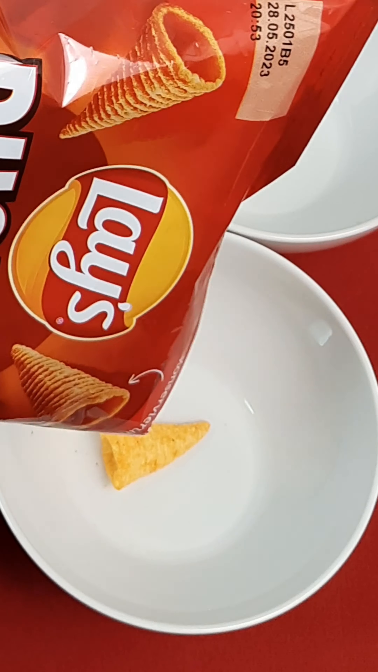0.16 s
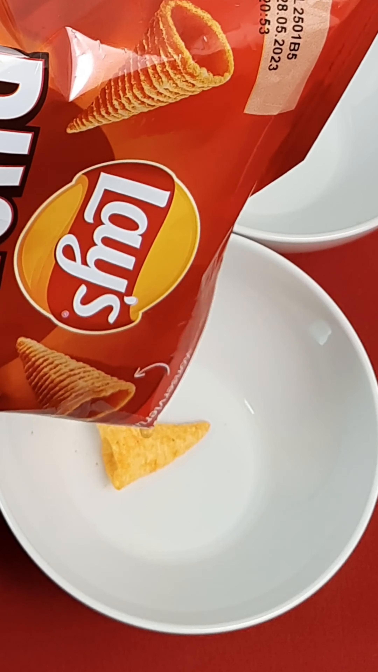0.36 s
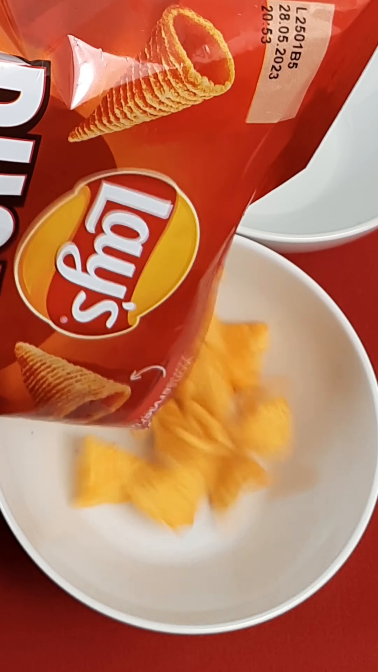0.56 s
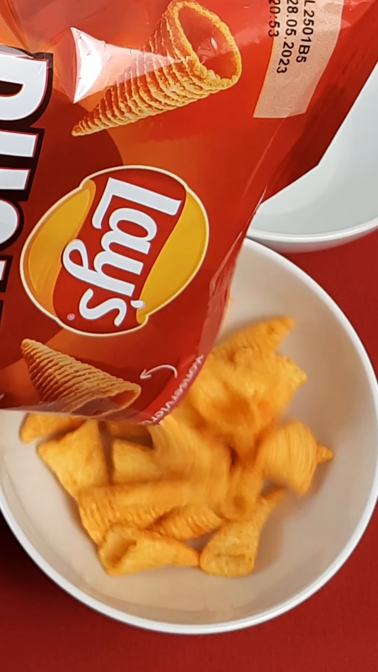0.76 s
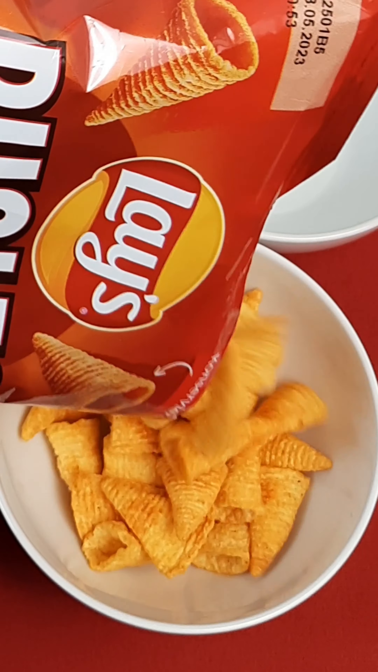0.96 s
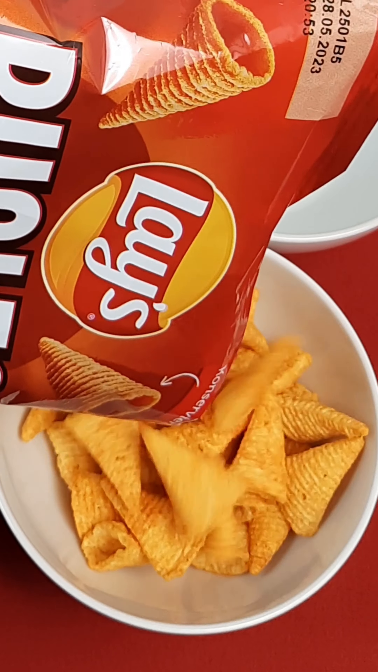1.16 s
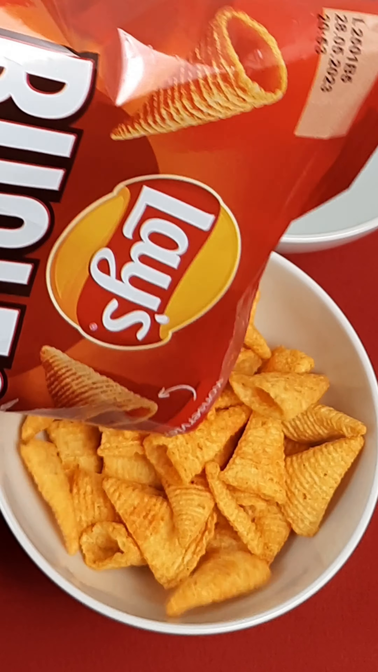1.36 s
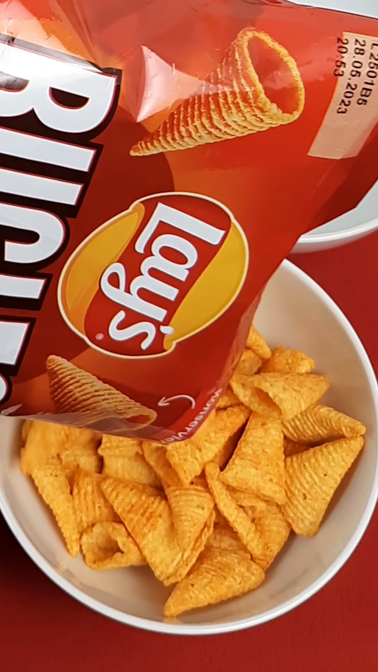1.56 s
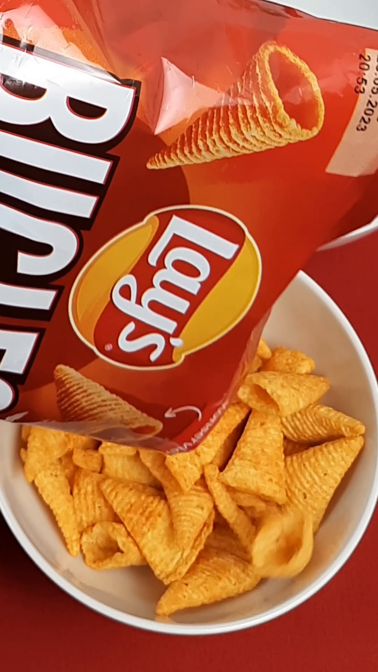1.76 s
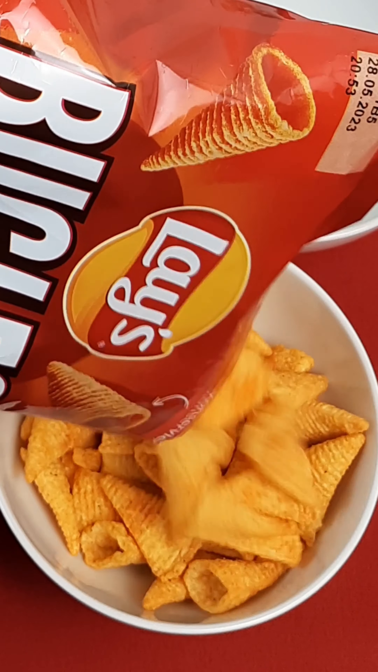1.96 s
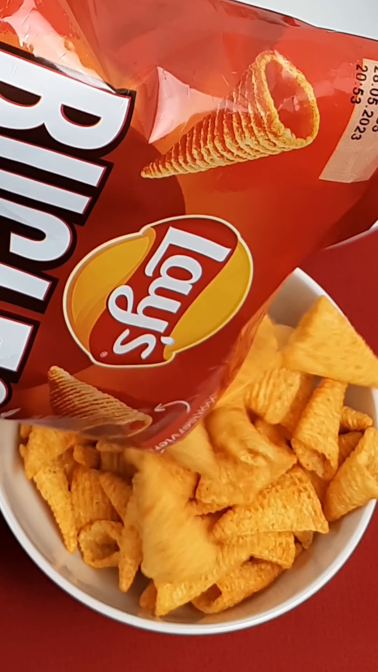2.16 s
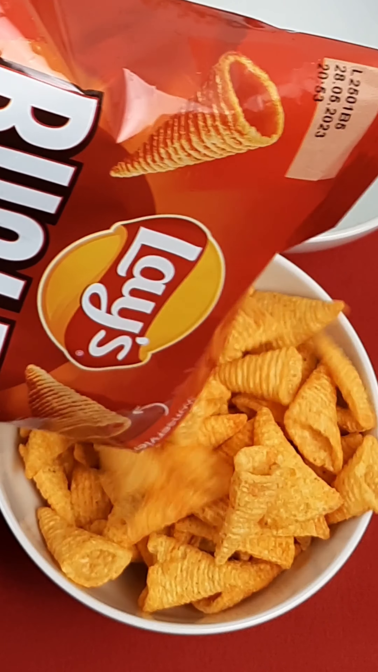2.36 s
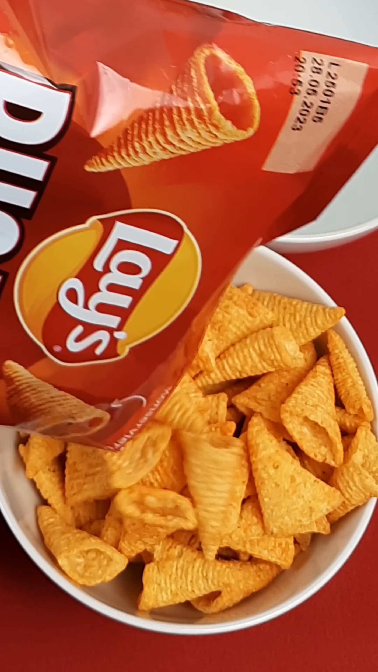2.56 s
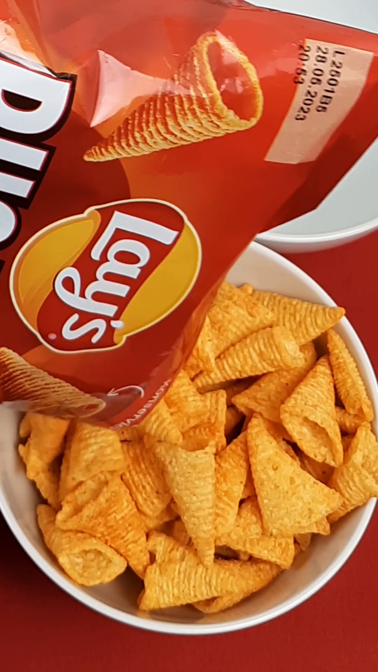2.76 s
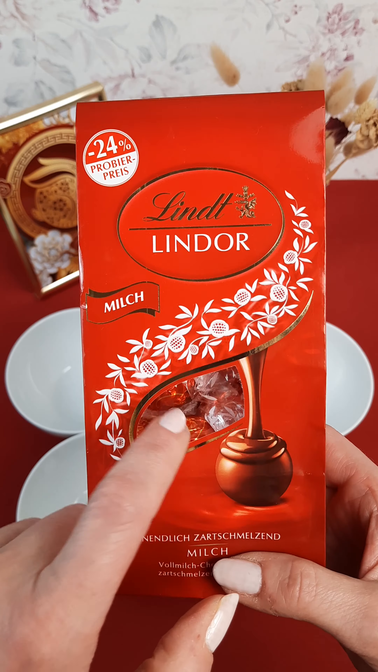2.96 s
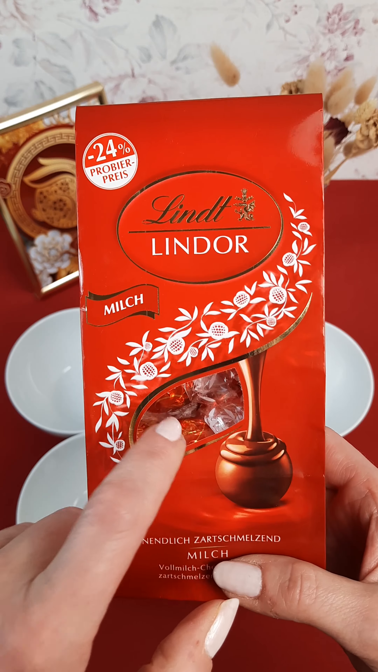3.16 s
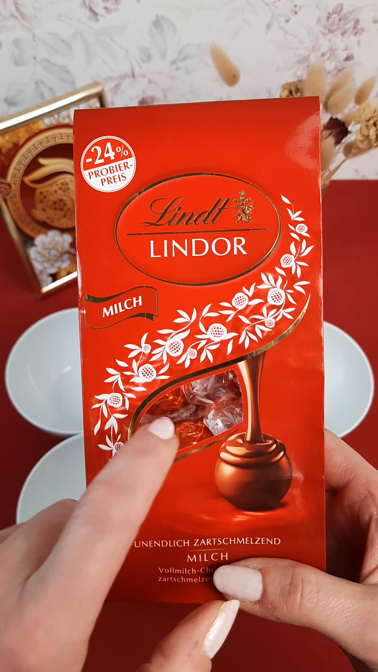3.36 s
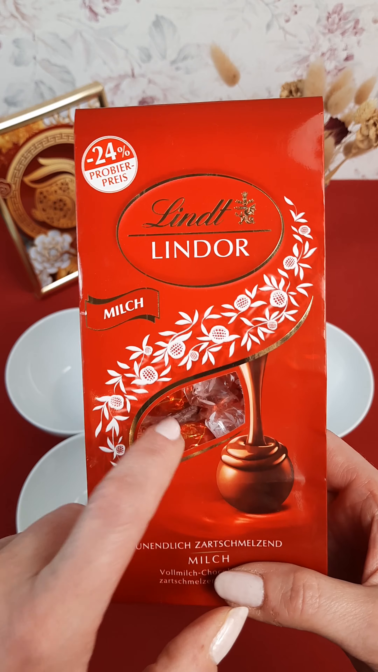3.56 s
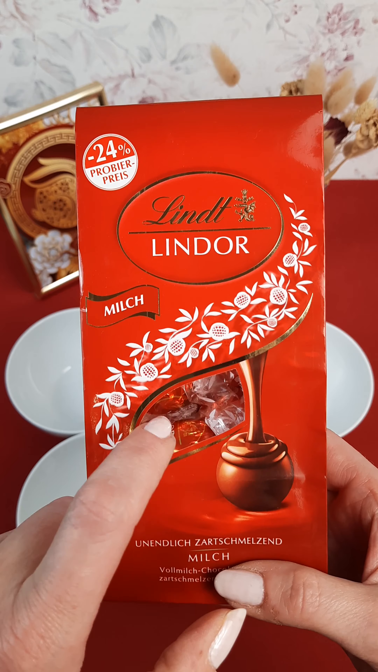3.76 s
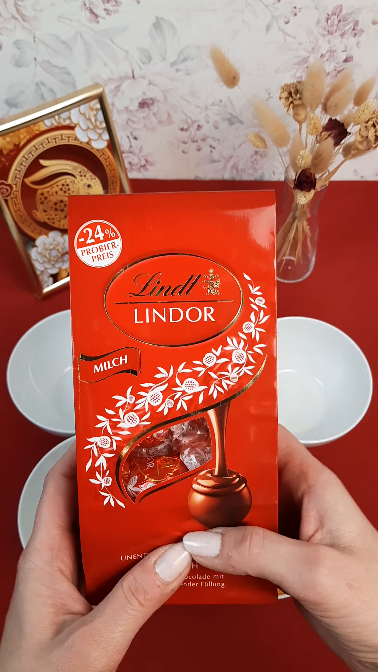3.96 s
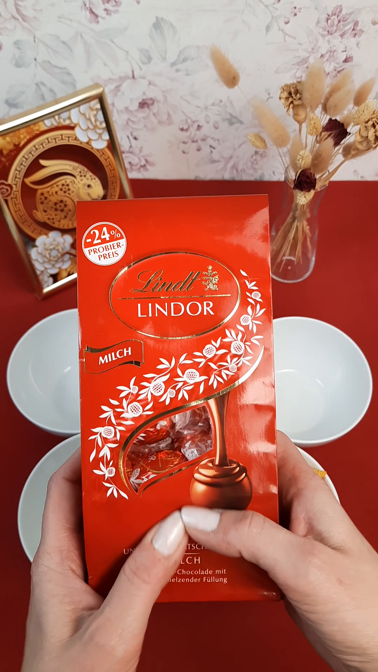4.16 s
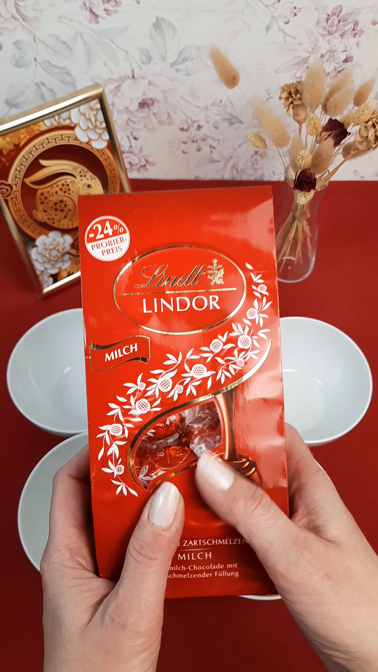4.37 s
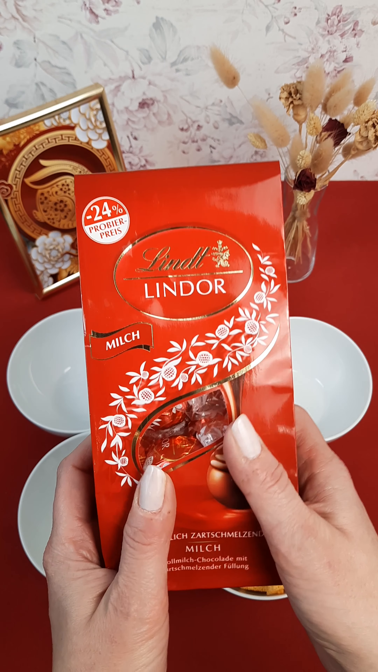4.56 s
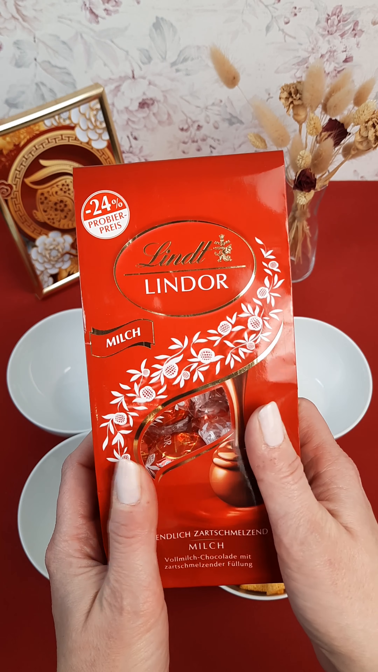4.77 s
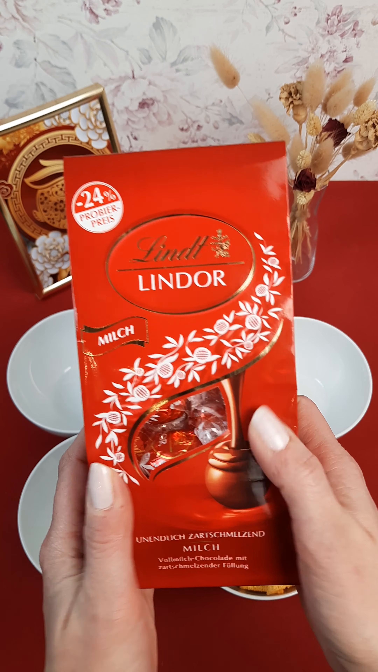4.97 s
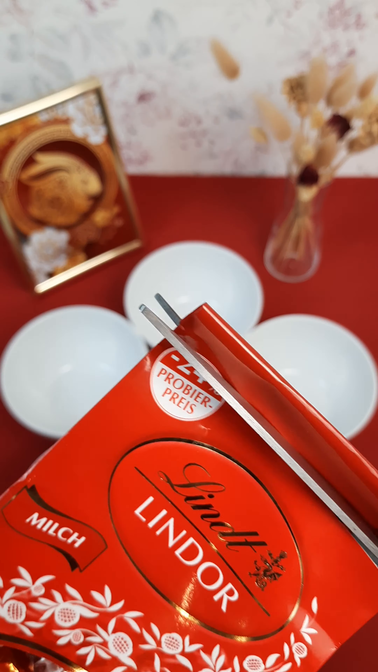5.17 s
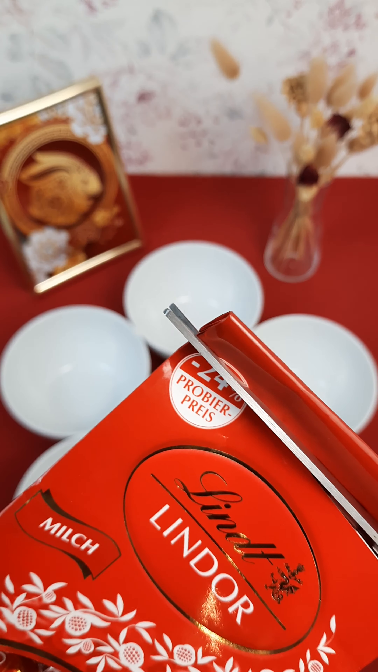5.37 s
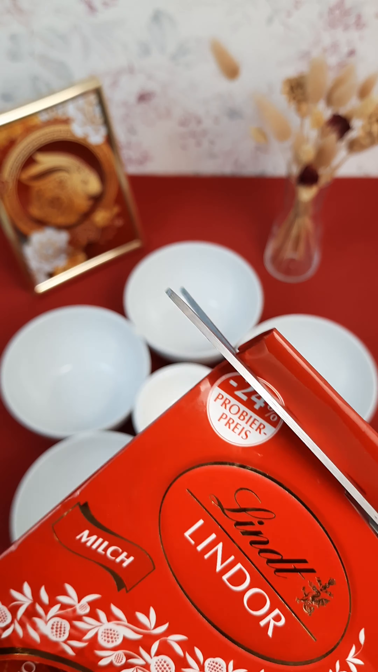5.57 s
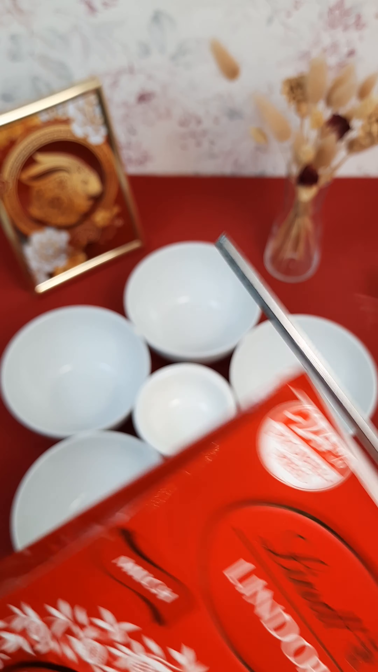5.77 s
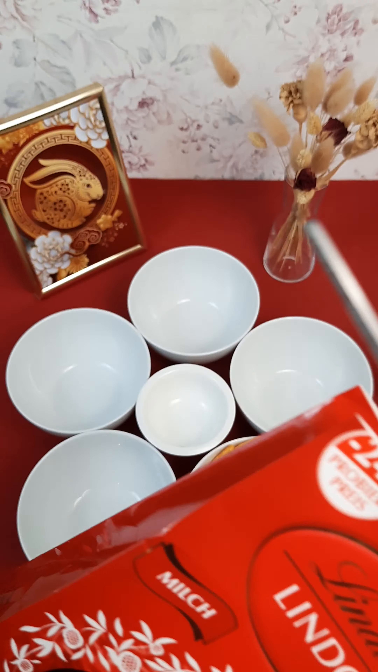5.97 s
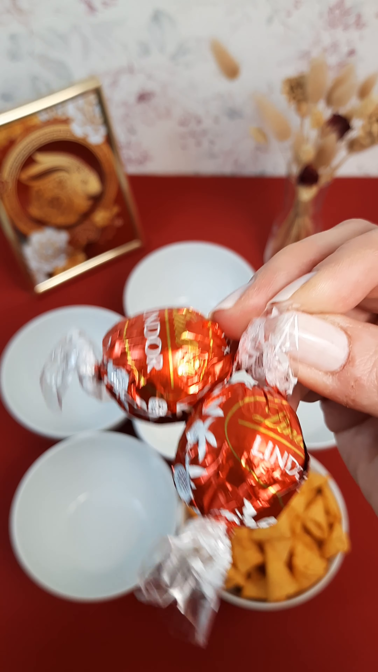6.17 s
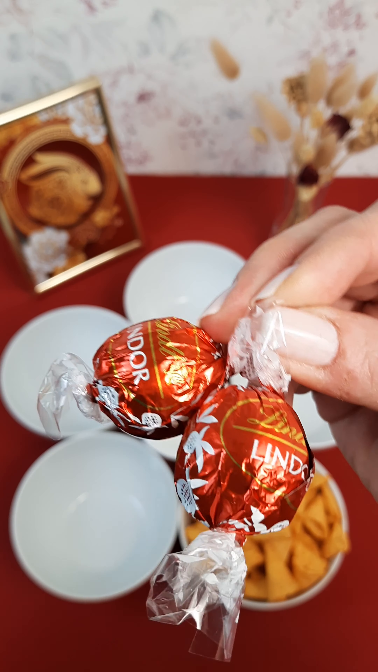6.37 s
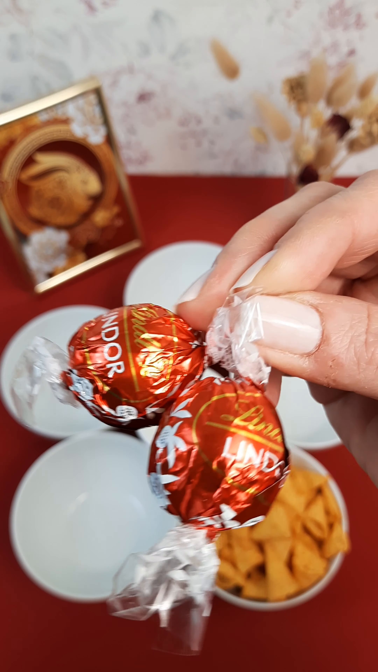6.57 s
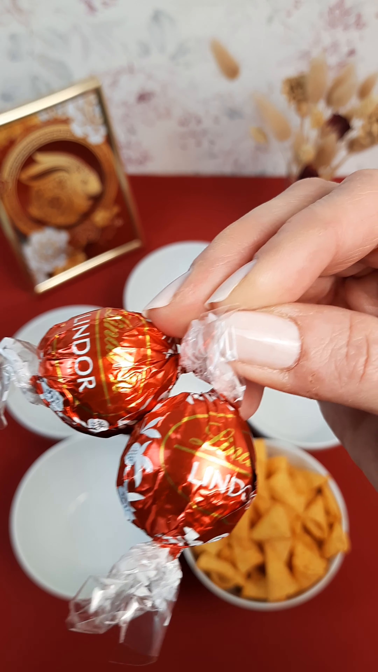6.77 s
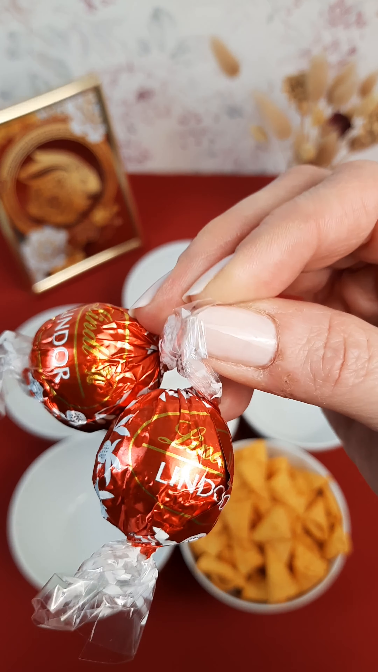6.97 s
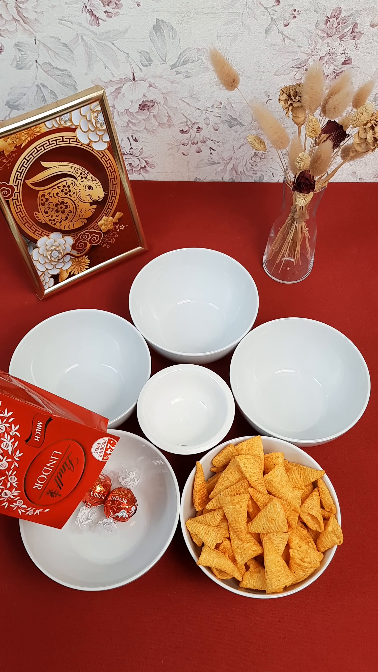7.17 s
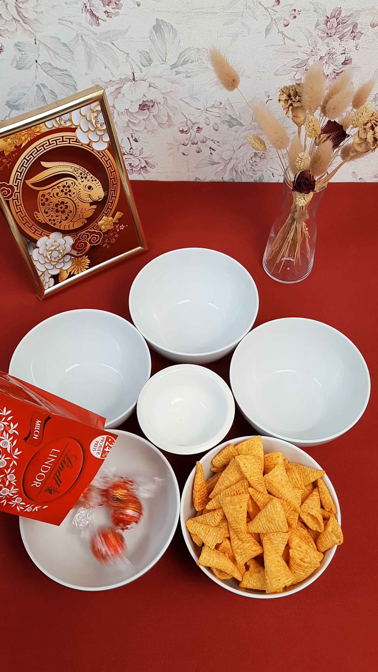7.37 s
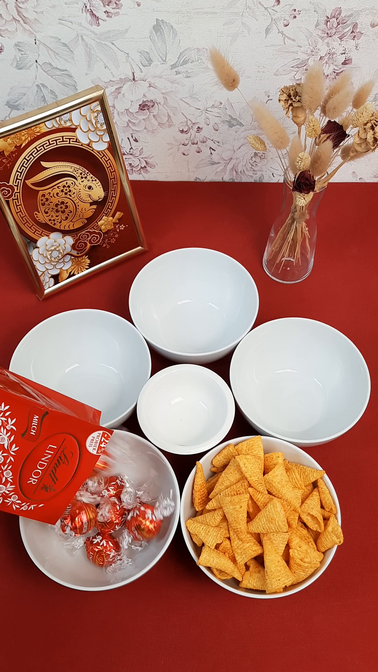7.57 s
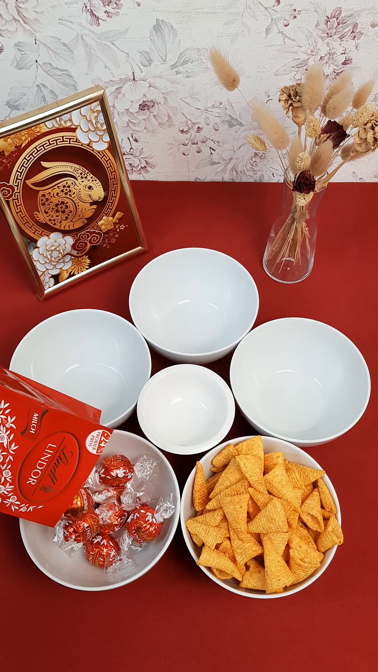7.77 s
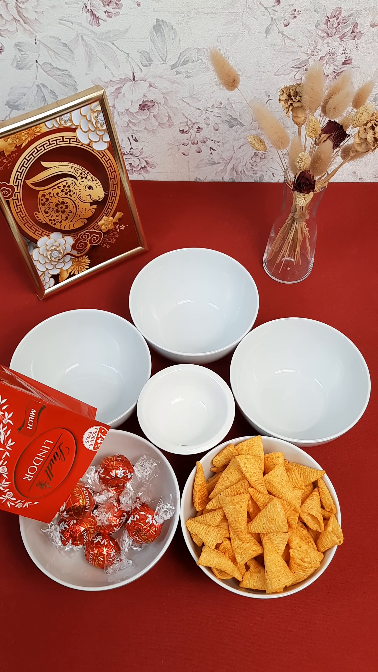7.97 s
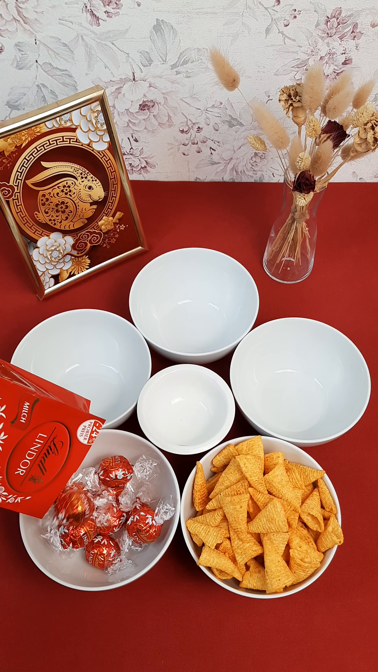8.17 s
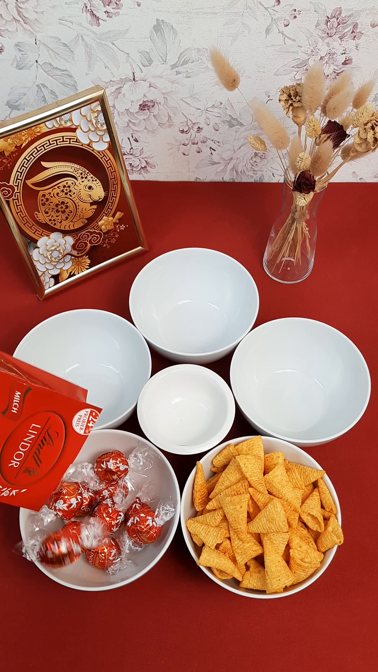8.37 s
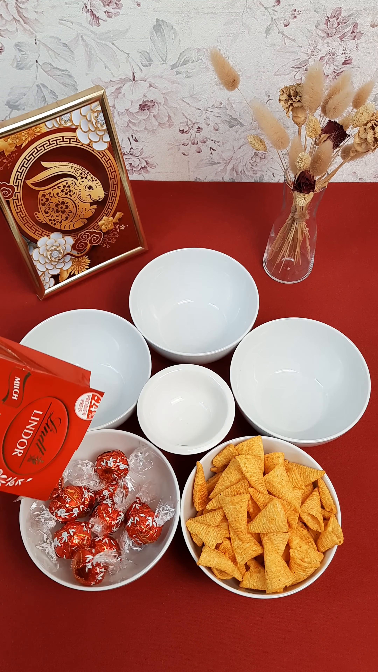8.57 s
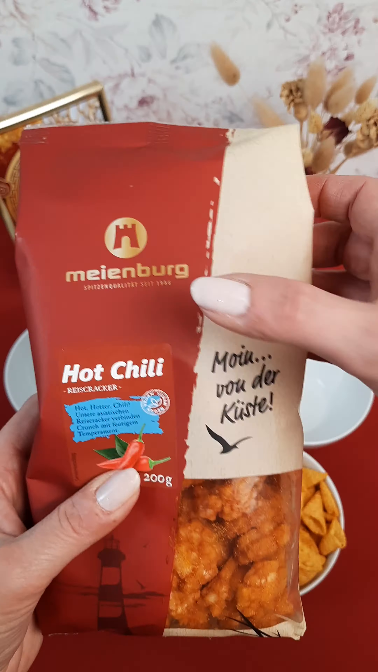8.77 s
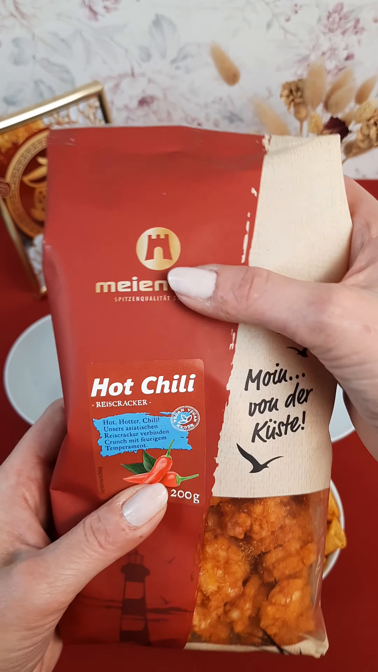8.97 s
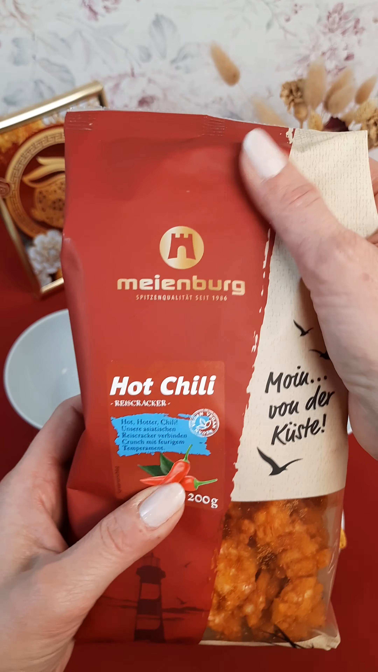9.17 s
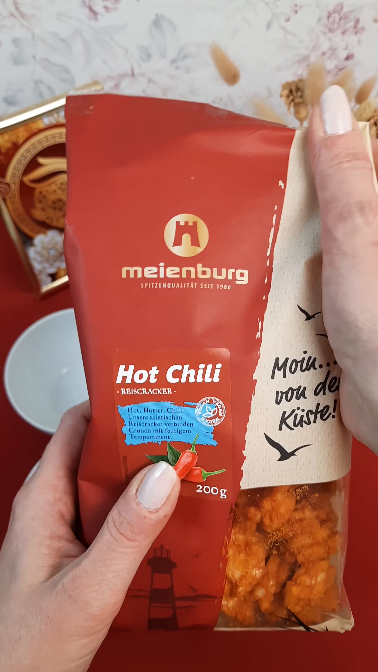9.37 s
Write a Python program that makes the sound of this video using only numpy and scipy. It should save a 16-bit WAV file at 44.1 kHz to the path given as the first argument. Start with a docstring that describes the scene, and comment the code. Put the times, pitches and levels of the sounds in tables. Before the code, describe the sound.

Crisp corn cones rattle into a china bowl, nails tap a stiff bag, scissors snip it, foil ticks, wrapped chocolates tumble into another bowl.

```python
"""Crisp corn cones pour into a china bowl, close by in a small room: noise grains and short rings.
Nails tap a stiff paper bag, hands flex it and scissors cut it: each contact excites air, panels and folds.
Foil wrappers tick, wrapped chocolates roll into a bowl of decaying modes, and another bag is picked up.
Hard cuts join these passages; room reflections follow all but the china, over a faint hush of noise."""
import sys
import numpy as np
from scipy import signal
from scipy.fft import rfft, irfft
from scipy.io import wavfile

SR = 44100
rng = np.random.default_rng(int(sys.argv[2]) if len(sys.argv) > 2 else 0)


def materialize(psi):
    """Save the field psi as 16-bit PCM at rate SR to the path in sys.argv[1].

    A 1-D psi becomes a single channel; in a 2-D psi each row is a channel.
    """
    bounded = np.clip(np.atleast_2d(psi).T, -1, 1)
    quanta = np.round(bounded * 32767).astype(np.int16)
    wavfile.write(sys.argv[1], SR, quanta)


N = 414981
TIME = np.arange(N) / SR
LEAD = 600  # samples of scraping before a contact gives
LEAD_S = LEAD / SR
# Air in a bag thumps much alike for any blow: dB for a blow of 0 dB, and dB per dB of blow.
AIR_DB, AIR_SLOPE = -29, 0.36

# Passages between hard cuts. Each row: start in seconds, end in seconds.
PASSAGES = [(0, .21), (.21, 2.983), (3.05, 4.0), (4.0, 6.09), (6.12, 7.153), (7.153, 8.823), (8.823, 9.42)]
# Stream of cones, two surges with a trickle after each. Each row: time in seconds, relative flow in dB.
POUR = [(.22, -54.5), (.42, -37), (.55, -35), (.78, -31), (1.0, -40), (1.18, -41.5), (1.29, -53),
        (1.55, -49.5), (1.83, -52), (1.93, -34), (2.07, -30.5), (2.18, -34.5), (2.42, -35.5), (2.67, -49),
        (2.98, -50.5)]
# Resonance of a cone's shell. Each row: frequency in hertz, relative level in dB.
SHELL = [(500, -25), (750, -10.5), (1200, -6), (2200, -11), (2900, -6), (3900, 0.5), (4700, -8),
         (5600, -15.5), (8000, -28)]
# Resonance of a splintering edge. Each row: frequency in hertz, relative level in dB.
SPLINTER = [(3800, -25), (5800, -4), (8300, 3), (9400, -8.5), (11000, -3.5), (12500, 0.5), (15800, -7.5)]
# Bag: three spectra, of thump, panel ring and crack. Each row: frequency in hertz, relative level in dB.
BAG = [
    [(40, -27.5), (100, -16), (190, -10), (320, 0.5), (440, 1), (620, -7), (1000, -36.5)],
    [(400, -19), (650, -7), (900, -0.5), (1200, 2.5), (1500, 2.5), (2100, -0.5), (3400, -6), (4500, -21),
     (7000, -44.5)],
    [(2500, -30), (4200, -1.5), (6000, -5.5), (8000, -8.5), (10000, -13), (15500, -15)],
]
# Wrapped chocolates: three spectra as for the bag. Each row: frequency in hertz, relative level in dB.
BALLS = [
    [(30, -25), (65, -4.5), (150, -14), (250, -2), (360, 7), (600, -2.5), (1000, -46.5)],
    [(400, -25), (720, 0.5), (1100, 3.5), (1700, -2), (2600, -5.5), (4000, -10), (6500, -49)],
    [(2500, -8.5), (4200, -3.5), (6000, -4), (9500, -6.5), (12500, -4.5), (15800, -8.5)],
]


def undb(db):
    """Amplitude ratio: decibels become a linear gain."""
    return 10 ** (np.asarray(db) / 20)


def on_log(hz, points):
    """Logarithmic frequency axis: read (Hz, value) points between their corners."""
    f, v = np.transpose(points)
    return np.interp(np.log(hz + 1e-3), np.log(f), v)


def colour(x, points, size=1024):
    """Minimum phase: ring x through a causal response of unit energy with this spectrum."""
    magnitude = undb(on_log(np.fft.rfftfreq(size, 1 / SR), points))
    cepstrum = irfft(np.log(magnitude))
    # Folding the cepstrum forward makes the response causal.
    cepstrum[1:size // 2] *= 2
    cepstrum[size // 2 + 1:] = 0
    h = irfft(np.exp(rfft(cepstrum)))
    return signal.oaconvolve(x, h[None] / np.linalg.norm(h), axes=1)[:, :x.shape[1]]


def add(out, s, x):
    """Superposition: mix a short stereo sound in at time s."""
    i = max(int(s * SR), 0)
    out[:, i:i + x.shape[1]] += x[:, :max(N - i, 0)]


def pan(db):
    """Level difference between the ears: left and right gains that differ by db."""
    return undb(np.array([[db], [-db]]) / 2)


def noise(size, alike):
    """Partial coherence: stereo noise whose channels share a part."""
    shared = rng.standard_normal(size)
    return np.sqrt(alike) * shared + np.sqrt(1 - alike) * rng.standard_normal((2, size))


def diffuse(size):
    """Diffuse field: long waves reach both microphones alike, short ones do not."""
    left, right = rfft(noise(size, 0))
    alike = 1 / (1 + (np.fft.rfftfreq(size, 1 / SR) / 600) ** 3)
    return irfft(np.array([left, alike * left + np.sqrt(1 - alike ** 2) * right]), size)


def moments(start, end, rate):
    """Jittered point process: uneven times between start and end, about rate a second."""
    count = max(int((end - start) * rate), 1)
    return start + (end - start) * (np.arange(count) + rng.random(count)) / count


def gain_of(curve):
    """Envelope: a (seconds, dB) curve as a gain, silent outside its span."""
    s, db = np.transpose(curve)
    inside = (TIME > s[0] - .007) & (TIME < s[-1] + .007)
    return undb(np.interp(TIME, s, db)) * inside


def contact(length, snap, alike, size=2800):
    """Stick and slip: surfaces scrape as they load, then give with a click and a dying flutter."""
    t = (np.arange(size) - LEAD) / SR
    length = np.clip(length, 1e-4, .012)
    # Long contacts swell in and click less.
    soft = length ** 2 / (length ** 2 + .007 ** 2)
    scrape = .35 * soft * np.exp(-abs(t) / .003)
    flutter = np.exp(-abs(t) / length) * (1 - soft * np.exp(-abs(t) / 0.0057))
    x = noise(size, alike) * np.where(t < 0, scrape, flutter)
    x[0, LEAD + 3] += snap * (1 - soft)
    x[1, LEAD + rng.integers(1, 8)] += snap * (1 - soft)
    return x


def blow(db, spectrum, length, snap, alike):
    """Impulse response: one contact rings a body, each spot at its own pitch; rms is db over 12 ms."""
    spot = np.exp(0.036 * rng.standard_normal())
    shifted = [(hz * spot, gain) for hz, gain in spectrum]
    x = colour(contact(length, snap, alike), shifted)
    return x * undb(db) / np.sqrt(np.mean(x[:, LEAD:LEAD + SR * 12 // 1000] ** 2))


def strike(body, thump_db, panel_db, crack_db, side_db, length, snap, thump_s):
    """Modal bands: a blow thumps the hollow body, rings its panels and cracks at the point of contact."""
    thump = blow(thump_db, body[0], length + thump_s, snap, 0.9)
    ring = blow(panel_db, body[1], length, snap, 0.46)
    crack = blow(crack_db, body[2], length, snap, 0.11)
    return thump + pan(side_db) * (ring + crack)


def tilted(body, tilt_db):
    """Spectral tilt: the same body with its panels ringing brighter by so many dB an octave."""
    panels = [(hz, db + tilt_db * np.log2(hz / 1500)) for hz, db in body[1]]
    return [body[0], panels, body[2]]


def bump(db, hz):
    """Damped oscillation: a soft weight rocks the bag or the table for a few cycles."""
    t = np.arange(SR // 8) / SR
    swell = t / 0.016 * np.exp(1 - t / 0.011)
    second_hz = hz * rng.uniform(0.49, 3.7)
    cycles = np.sin(2 * np.pi * hz * t) + 0.86 * np.sin(2 * np.pi * second_hz * t)
    return pan(0) * undb(db) * swell * cycles


def random_sizes(chance, spread_db):
    """Exponential spread in dB: many small events and a few large ones, or the reverse if negative."""
    return undb(spread_db * np.minimum(-np.log(1 - chance), 4))


def grains(rate, spread_db, length, alike, hiss):
    """Shot noise: countless small contacts of random size as bursts of noise, rms near 1."""
    chance = rng.random((int(rate * N / SR), 2))
    at = (chance[:, 0] * (N - 10)).astype(int)
    hits = np.bincount(at, random_sizes(chance[:, 1], spread_db) ** 2, N)
    power = signal.lfilter([1], [1, -np.exp(-1 / (length * SR))], hits)
    return noise(N, alike) * np.sqrt(power / power.mean() + hiss) / np.sqrt(1 + hiss)


def pings(gain, spectrum, rate, spread_db, ring_s, size=400):
    """Free vibration: small pieces collide, each ringing at its own pitch; the rms follows gain."""
    chance = rng.random((int(rate * N / SR), 5))
    at = (chance[:, 0] * (N - size)).astype(int)
    heard = gain[at] > 0
    chance, at = chance[heard], at[heard]
    t = np.arange(size) / SR
    # Pitches crowd where the body resonates.
    axis = np.linspace(spectrum[0][0], spectrum[-1][0], size)
    likely = np.cumsum(undb(2 * on_log(axis, spectrum)))
    hz = np.interp(chance[:, 1], likely / likely[-1], axis)
    decay = np.exp(-t / ring_s) * (1 - t / t[-1])
    strength = random_sizes(chance[:, 2], spread_db)
    rms = np.sqrt(np.mean(strength ** 2) * np.sum(decay ** 2) / 2 * rate / SR)
    strength = gain[at] * strength / rms
    index = (at[:, None] + np.arange(size)).ravel()
    channels = []
    for phase in chance[:, 3:].T:
        rings = strength[:, None] * decay * np.sin(2 * np.pi * (hz[:, None] * t + phase[:, None]))
        channels.append(np.bincount(index, rings.ravel(), N))
    return np.array(channels)


def rustle(curve, body, rate, spread_db, flex_db, flex_power, rub_db, crinkle_db, crinkle_power, side_db):
    """Friction and buckling: one effort flexes walls in bumps, rubs in slips and pops, crinkles folds."""
    rub = gain_of(curve)
    top = undb(max(db for _, db in curve))
    # A greater power fades faster as the effort drops.
    flex = top * (rub / top) ** flex_power
    crinkle = top * (rub / top) ** crinkle_power
    low = flex * undb(flex_db) * colour(grains(140, 1.7, .007, .9, 0.21), body[0])
    slips = rub * undb(-2.0) * colour(grains(rate, spread_db, .0015, 1.0, .4), body[1])
    pops = pings(rub * undb(-5.5), body[1], rate=220, spread_db=3.0, ring_s=0.005)
    folds = colour(grains(2 * rate, spread_db, .0006, 0.033, 0.94), body[2])
    high = crinkle * undb(crinkle_db) * folds
    return low + pan(side_db) * (undb(rub_db) * (slips + pops) + high)


def crinkles(curve, body, rate, panel_db, crack_db, scatter_db):
    """Buckling: lone small folds give way at random, about as strongly as the effort of the moment."""
    out = np.zeros((2, N))
    times = moments(curve[0][0], curve[-1][0], rate)
    levels = np.interp(times, *np.transpose(curve)) + scatter_db * rng.uniform(-2.5, 1, len(times))
    for s, db in zip(times, levels):
        panel = blow(db + panel_db, body[1], 0.0023, 2.9, 0.36)
        crack = blow(db + crack_db, body[2], 0.0046, 6.4, .1)
        add(out, s - LEAD_S, pan(2) * (panel + crack))
    return out


def hush():
    """Stationary noise: the faint steady background of the room."""
    # Each row: frequency in hertz, relative level in dB.
    quiet = [(15, -35.5), (25, -3.5), (87, 4), (217, -10), (335, -3), (863, -17), (1840, -18),
             (4370, -24.5), (6050, -27.5), (10400, -25.5), (16000, -22.5)]
    return undb(-74.5) * colour(noise(N, 0.19), quiet, size=4096)


def thin_bag():
    """Unenclosed panels: the scissors' last two bites cut through the thin bag of cones, which crackles with no
    air to thump."""
    out = np.zeros((2, N))
    first = blow(-46.0, BAG[1], 0.015, 11, .55) + blow(-42.0, BAG[2], 0.0076, 9.7, .1)
    second = blow(-37.5, BAG[1], 0.007, 3.6, 0.32) + blow(-41, BAG[2], 0.005, 6, .1)
    add(out, .0219 - LEAD_S, pan(4) * first)
    add(out, .0472 - LEAD_S, pan(1.7) * second)
    return out


def clumps():
    """Random modulation: a gain near 1 that swells and sags as clumps of cones arrive."""
    times = moments(0, N / SR, rate=33)
    gain = undb(np.interp(TIME, times, 1.9 * rng.uniform(-2, 2, len(times))))  # factor in dB
    return gain / np.sqrt(np.mean(gain ** 2))


def cone_stream():
    """Granular flow: brittle cones rattle, splinter and thud on the heap in step with the flow."""
    # The heap's dull resonance. Each row: frequency in hertz, relative level in dB.
    heap = [(35, -32.5), (110, -12.5), (220, -6), (315, 3.5), (420, -3.5), (650, -7), (1100, -26.5)]
    flow = gain_of(POUR) * clumps()
    rattle = flow * undb(-1.0) * colour(grains(300, 3.3, .0052, .05, .3), SHELL)
    rings = pings(flow, SHELL, rate=720, spread_db=4.0, ring_s=0.0016)
    splinters = flow * undb(-3.5) * colour(grains(480, 4.1, 0.0022, 0.051, 0.31), SPLINTER)
    shake = flow * (flow / flow.max()) ** .03  # a trickle shakes the heap less
    thud = shake * undb(-5.5) * colour(grains(120, 2.8, 0.0089, 0.93, 0.75), heap)
    return pan(1.3) * (rattle + rings + splinters) + thud


def shell_ring(db, t60, size=2200):
    """Shell modes: a hollow cone rings briefly with a few modes of its own."""
    t = np.arange(size) / SR
    hz = rng.uniform(2700, 4500, (3, 1))
    x = np.sin(2 * np.pi * (hz * t + rng.random((2, 3, 1)))).sum(axis=1)
    return x * undb(db - 60 * t / t60)


def landing_cones():
    """Brittle impact: single cones land, cracking shell and edge, amid lesser ones that follow the flow."""
    # The loudest cones. Each row: time in seconds, relative shell level in dB, relative splinter level in dB.
    loudest = [(0.298, -35.5, -44.5), (0.4194, -40, -36), (0.538, -26.5, -31), (0.5655, -31, -22),
               (0.5991, -20.5, -25), (.6093, -25.5, -32), (0.6226, -17, -22.5), (0.6609, -20.5, -27.5),
               (0.7516, -34.5, -28.5), (.877, -29, -31), (.946, -24.5, -30), (1.011, -27.5, -30),
               (1.0764, -38, -29.5), (1.121, -31, -34), (1.1327, -24, -29), (1.2717, -37, -33.5),
               (1.3153, -42.5, -43.5), (1.4164, -38, -41), (1.4574, -36.5, -42.5), (1.5205, -33, -46),
               (1.7811, -39, -48), (1.8793, -29.5, -41.5), (1.9572, -26, -33.5), (1.9893, -27.5, -35),
               (2.0733, -26, -33.5), (2.162, -22.5, -29.5), (2.2026, -27, -51), (2.2687, -41, -38),
               (2.386, -27.5, -53), (2.4266, -26.5, -61), (2.4962, -30, -36.5), (2.5974, -38, -60),
               (2.7513, -46, -60), (2.8056, -40.5, -38.5), (2.8902, -36, -41), (2.9582, -40, -42.5),
               (2.973, -32.5, -37)]
    out = np.zeros((2, N))
    times = moments(POUR[0][0], POUR[-1][0], rate=13)
    levels = np.interp(times, *np.transpose(POUR)) + 4 + 2 * rng.standard_normal(len(times))
    lesser = [(s, db, db - 9) for s, db in zip(times, levels)]
    for s, shell_db, splinter_db in loudest + lesser:
        side = pan(1.7 + 3.1 * rng.standard_normal())
        pitch = np.exp(0.057 * rng.standard_normal())  # each cone has its own size
        shell = [(hz * pitch, db) for hz, db in SHELL]
        splinter = [(hz * pitch, db) for hz, db in SPLINTER]
        crack = blow(shell_db - 5, shell, 0.0085, 0.83, 0.04)
        crack = crack + blow(splinter_db - .5, splinter, 0.0052, 4.6, 0.053)
        add(out, s - LEAD_S, side * crack)
        add(out, s, side * shell_ring(shell_db, t60=0.035))
    return out


def bowl(clinks, modes, side_db, end_s):
    """Modal decay: glazed china rings until its passage ends; hardness tilts the modes' strengths."""
    out, t = np.zeros((2, N)), np.arange(SR // 2) / SR
    for s, db, hardness in clinks:
        for hz, mode_db, t60 in modes:
            lag = np.array([[0], [rng.uniform(0.067, 1)]])  # phase of each channel in radians
            strength_db = db + mode_db + hardness * np.log2(hz / modes[0][0])
            add(out, s, np.sin(2 * np.pi * hz * t + lag) * undb(strength_db - 60 * t / t60))
    return pan(side_db) * out * (TIME < end_s)


def cone_bowl():
    """Struck shell: the cones' bowl clinks under the pour."""
    # Each row: time in seconds, relative level in dB, hardness in dB per octave.
    clinks = [(.566, -42.5, 1), (.66, -43.5, 1.5), (.79, -30, 1), (.925, -27, -6.5), (.9648, -35.5, -16),
              (1.075, -35.5, 2), (1.52, -33.5, -1), (1.881, -30, 0.5), (2.162, -33.5, 0.5),
              (2.34, -33, -4.5)]
    # Each row: frequency in hertz, relative level in dB, time to fall by 60 dB in seconds.
    modes = [(1232, -6, .4), (1712, -25, .29), (2799, 1, .3), (4835, -6, .25), (7305, -13, .2),
             (10120, -17, .15), (11850, -17, .12)]
    return bowl(clinks, modes, 1.0, PASSAGES[1][1])


def taps():
    """Elastic panel: the nail touches, the fingertip dents the panel, and it springs back and rebounds."""
    # Each row: time in seconds, relative level in dB, time held in seconds, rebound in dB over springing back.
    finger_taps = [(3.084, -33.5, .0519, -31), (3.283, -27.5, 0.053, -26), (3.4817, -31, .0431, -9.5),
                   (3.6547, -32.5, .0529, -7.5)]
    # Spectra of air inside, panels and folds. Each row: frequency in hertz, relative level in dB.
    tapped = [
        [(40, -22), (100, -11.5), (170, -3.5), (240, -3.5), (315, 2), (440, -2.5), (620, -8), (1000, -47.5)],
        [(400, -17.5), (650, -6.5), (880, -3.5), (1150, -1.5), (1490, 5.5), (1760, 2), (2200, -4), (3100, -9.5),
         (4400, -16), (7000, -35)],
        [(2500, -19.5), (4200, 2.5), (6000, -4), (8000, -11), (10000, -12.5), (15500, -19)],
    ]
    pad_lag_s, rebound_s, spring_back_db = 0.011, 0.015, -31.5
    out = np.zeros((2, N))
    for s, db, held, rebound_db in finger_taps:
        at = s - LEAD_S
        nail = strike(tapped, db - 8, db - 3.0, db - 16.0,
                      side_db=3.5, length=0.0067, snap=7.8, thump_s=.01)
        pad = strike(tapped, db - 9, db - 7, db - 18.5,
                     side_db=6.0, length=0.0025, snap=12.6, thump_s=.01)
        add(out, at, nail)
        add(out, at + pad_lag_s, pad)
        add(out, s + pad_lag_s, bump(db - 22, hz=169.5))
        for lag, back_db in [(0, spring_back_db), (rebound_s, spring_back_db + rebound_db)]:
            back = strike(tapped, back_db - 9.5, back_db, back_db - 15.5,
                          side_db=3.0, length=0.0014, snap=7.2, thump_s=0.009)
            add(out, at + held + lag, back)
    return out


def paper_bag_handling():
    """Friction and buckling: hands flex, rub and crinkle the stiff paper bag."""
    # Each row: time in seconds, relative effort in dB.
    effort = [(4.02, -64), (4.1, -74), (4.2, -58), (4.3, -60), (4.45, -55), (4.66, -55.5), (4.79, -59.5),
              (4.93, -56.5), (5.3, -59.5), (5.4, -59), (5.49, -67), (5.58, -51.5), (5.7, -72), (5.74, -51),
              (5.9, -58.5), (6.0, -77.5), (6.07, -50)]
    out = rustle(effort, BAG, rate=220, spread_db=2, flex_db=2, flex_power=1.9, rub_db=-2.0,
                 crinkle_db=-4.5, crinkle_power=1.0, side_db=2.5)
    return out + crinkles(effort, BAG, rate=12, panel_db=6, crack_db=4.5, scatter_db=6)


def creases():
    """Snap-through: a crease gives, the sharper the brighter the panel rings, and the air thumps."""
    # Each row: time in seconds, relative level in dB, crack in dB over that level, nominal contact in seconds.
    snaps = [(4.2264, -43.5, -19, .0045), (4.2765, -33, -39, 0.0018), (4.3571, -28, -7, 0.0023),
             (4.4631, -49, -10.5, .003), (4.5487, -27, -7.5, 0.0014), (4.6162, -37.5, -40, 0.0042),
             (4.6939, -39, -18.5, 0.0015), (4.7377, -53.5, -15, 0.0013), (4.7726, -53.5, -1.5, .005),
             (4.8485, -27.5, -7.5, 0.0013), (4.8941, -52.5, 3, .004), (4.9153, -32, -21, 0.0028),
             (8.9503, -41.5, -18, 0.011), (9.0578, -40.5, -25, 0.0035), (9.079, -36.5, -45, 0.0034),
             (9.1216, -36, -34, .0017), (9.1637, -30, 1, 0.0053), (9.1919, -28, 2, .0033),
             (9.211, -27, -5, 0.00034), (9.2324, -32.5, -0.5, 0.0056), (9.2936, -37, -19, 0.0017)]
    out = np.zeros((2, N))
    for s, db, crack_db, length in snaps:
        body = tilted(BAG, .13 * (crack_db + 14))
        add(out, s - LEAD_S, strike(body, AIR_DB + AIR_SLOPE * db, db, db + crack_db,
                                    side_db=2.5, length=length, snap=6.7, thump_s=0.0056))
    return out


def load_shifts():
    """Damped oscillation: a shifting load bumps dully, with a scuff around the same pitch."""
    # Each row: time in seconds, relative level in dB, pitch in hertz.
    shifts = [(4.921, -44, 231), (4.983, -44, 208), (5.016, -47, 167), (5.405, -42, 223),
              (5.562, -43, 149.7), (5.66, -47.5, 298), (5.765, -42, 94), (5.785, -40, 51.5),
              (5.809, -36.5, 115), (7.99, -55.5, 279)]
    out = np.zeros((2, N))
    for s, db, hz in shifts:
        scuff = [(hz / 4, -20), (hz, 0), (hz * 2, -8), (hz * 4, -30)]
        add(out, s - .005, bump(db, hz))
        add(out, s - LEAD_S, blow(db - 2.5, scuff, 0.0093, 0.98, 1.0))
    return out


def snips():
    """Fracture: each bite of the scissors thumps, rings and cracks the paper; quick bites are brightest."""
    # Each row: time in seconds, relative level in dB, left minus right in dB, nominal contact in seconds.
    bites = [(5.2003, -42.5, -3, 0.0051), (5.2258, -37, -2, 0.0052), (5.2491, -25.5, -0.5, 0.0024),
             (5.266, -39.5, 7.5, 0.0017), (5.344, -22.5, -0.5, 0.0027), (5.399, -47.5, 5.5, 0.011),
             (5.5488, -37, 0.5, 0.022), (5.7549, -28.5, -2.5, 0.0054), (5.7752, -32.5, 1.5, 0.011),
             (5.8073, -37.5, 2.5, .012), (6.0339, -30.5, 5.5, 0.0067)]
    # Spectra of thump, panel ring and crack. Each row: frequency in hertz, relative level in dB.
    cut_bag = [
        [(35, -24.5), (90, -8), (200, -0.5), (380, 1.5), (600, -3), (1000, -34)],
        [(400, -32), (700, -1.5), (1200, -3), (1800, 2), (2700, -3), (3800, -6), (6000, -33.5)],
        [(2500, -27.5), (4200, 2.5), (6100, 2), (8500, -3.5), (11600, -9), (13500, -4), (15800, -18.5)],
    ]
    open_s, open_db = 5.9, -2  # with its top off, the bag thumps less
    out = np.zeros((2, N))
    for s, db, side_db, length in bites:
        slowness = np.log2(length / 0.0022)  # doublings of the contact time
        thump_db = AIR_DB + 2.5 + AIR_SLOPE * db + open_db * (s > open_s)
        body = tilted(cut_bag, 2 - 1.4 * slowness)
        add(out, s - LEAD_S, strike(body, thump_db, db - .5, db - 2.0 - 1.8 * slowness,
                                    side_db, length, snap=2.8, thump_s=.0078))
    return out


def blades():
    """Impact of stiff plates: the steel blades clack shut with a brief shiver."""
    # Each row: frequency in hertz, relative level in dB.
    steel = [(2500, -30), (4800, -15), (6100, 4), (6900, -2.5), (9300, -8), (10300, -4), (11600, 4),
             (13000, -8), (15800, -10)]
    out = np.zeros((2, N))
    add(out, 5.7611 - LEAD_S, pan(1.5) * blow(-21.0, steel, 0.0013, 3, 0.21))
    add(out, 5.764 - LEAD_S, pan(1.5) * blow(-37.5, steel, 0.012, 0.92, .2))
    return out


def finger_squeak():
    """Stick and slip: a fingertip slides over foil with a faint squeak."""
    slide = np.interp(TIME, [6.12, 6.16, 6.21, 6.245], [0.087, 0.92, 0.8, 0.035], left=0, right=0)
    squeak = [(900, -17), (1900, -13), (2250, -3.5), (2700, -15), (7000, -14), (14000, -22.0)]
    return undb(-70.5) * slide * colour(grains(399, 3.3, .001, 0.36, 0.3), squeak)


def foil_ticks():
    """Buckling: thin foil gives in lone ticks, the small ones hardest in the middle of a squeeze."""
    # The loudest ticks of held foil twists. Each row: time in seconds, relative level in dB.
    loud_ticks = [(6.2295, -46.5), (6.3325, -50), (6.3792, -38.5), (6.3939, -49), (6.4408, -41),
                  (6.4532, -40.5), (6.4984, -44), (6.6413, -44), (6.6842, -32.5), (6.756, -44),
                  (6.8244, -48), (6.9597, -39), (7.0045, -38.5)]
    # Each row: start in seconds, end in seconds, relative level of the small ticks in dB.
    squeezes = [(6.3, 6.501, -46.5), (6.58, 6.832, -44.5), (6.935, 7.023, -55.5)]
    # Each row: frequency in hertz, relative level in dB.
    foil = [(1000, -23.5), (3200, -20.5), (5000, -3.5), (7000, 1), (10000, -3), (13000, 2.5), (16000, -5.5)]
    out, ticks = np.zeros((2, N)), list(loud_ticks)
    for start, end, db in squeezes:
        for s in moments(start, end, rate=45):
            off_centre = abs(2 * (s - start) / (end - start) - 1)
            ticks.append((s, db - 9 * off_centre + 2.5 * rng.standard_normal()))
    for s, db in ticks:
        add(out, s - LEAD_S, pan(5.5) * blow(db - 17.0, foil, .0006, 5.3, .2))
    return out


def wrapper_sliding():
    """Friction and buckling: wrappers slide out of the bag."""
    # Each row: time in seconds, relative flow in dB.
    slide_flow = [(7.16, -46.5), (7.28, -41.5), (7.38, -36), (7.46, -38.5), (7.53, -36.5), (7.655, -35),
                  (7.69, -50), (7.82, -61.5), (7.97, -68), (8.1, -60.5), (8.35, -55.5), (8.53, -52.5),
                  (8.63, -54), (8.68, -105)]
    out = rustle(slide_flow, BALLS, rate=170, spread_db=3.0, flex_db=-6, flex_power=1.9, rub_db=-1.5,
                 crinkle_db=-0.5, crinkle_power=0.77, side_db=3.0)
    return out + crinkles(slide_flow, BALLS, rate=16, panel_db=-3, crack_db=3.0, scatter_db=6)


def drops():
    """Impact: each chocolate knocks and crushes its wrapper; the heavy ones rock the table more."""
    # Each row: time in seconds, relative knock in dB, relative thump in dB, nominal contact in seconds.
    tumbles = [(7.1726, -27, -53, 0.0099), (7.2064, -30, -53, 0.0075), (7.2233, -32.5, -44, 0.0089),
               (7.2495, -29.5, -66, 0.0066), (7.343, -23.5, -26.5, 0.0023), (7.3679, -17.5, -17.5, .002),
               (7.4204, -31, -30, 0.0044), (7.4755, -25, -30, 0.0097), (7.4927, -27, -30, 0.0054),
               (7.5861, -32, -35.5, 0.0056), (7.6383, -27, -51, 0.0062), (7.6546, -32, -35, 0.0068),
               (7.8741, -53, -84, .0049), (8.1288, -44, -53.5, 0.0052), (8.2072, -83, -67, 0.0096),
               (8.4775, -53, -78, 0.0064), (8.5234, -45, -60, 0.012), (8.6019, -45, -74, 0.0059)]
    wrapper_db = -41  # a wrapper crushed by a knock of 0 dB
    table_hz, table_give_db = 76.3, -39.5  # the table's note and the greatest level given to its bump
    out = np.zeros((2, N))
    for s, knock_db, thump_db, length in tumbles:
        add(out, s - LEAD_S, strike(BALLS, thump_db - 2.5, knock_db - 6.5, wrapper_db + 0.08 * knock_db,
                                    side_db=2.0, length=length, snap=7.2, thump_s=0.004))
        add(out, s, bump(min(thump_db - 7, table_give_db), table_hz))
    return out


def chocolate_bowl():
    """Modal damping: the second bowl rings until the last chocolate rests against it and mutes it."""
    # Each row: time in seconds, relative level in dB, hardness in dB per octave.
    clinks = [(7.368, -34.5, -13), (7.587, -48, -4), (7.656, -45.5, -7), (8.511, -37.5, -5),
              (8.526, -44, 3.5), (8.601, -35.5, -3)]
    # Each row: frequency in hertz, relative level in dB, time to fall by 60 dB in seconds.
    modes = [(1203, 0.5, 0.54), (1210, -19, .35), (2767, -7.5, 0.35), (4740, -17, 0.23), (7450, -26, .2)]
    settles_s, mute_s, mute_db = 8.63, 0.021, -9
    mute = undb(np.interp(TIME, [settles_s, settles_s + mute_s], [0, mute_db]))
    return mute * bowl(clinks, modes, 1.0, PASSAGES[5][1])


def wrapper_scuff():
    """Friction: a last wrapper squeaks against the glaze of the bowl in small pings."""
    push = np.interp(TIME, [8.385, 8.415, 8.445, 8.51], [0, 0.71, 0.038, 0.37], left=0, right=0)
    scuff = [(1600, -18), (2500, -1.5), (3400, -7), (4800, -27)]
    return pings(undb(-38.5) * push, scuff, rate=500, spread_db=3.5, ring_s=0.007)


def bag_lifting():
    """Friction and buckling: hands pick up the last bag."""
    # Each row: time in seconds, relative effort in dB.
    effort = [(8.83, -59), (8.93, -78), (8.97, -50), (9.18, -46), (9.28, -50), (9.41, -44.5)]
    body = [BAG[0], BAG[1], BALLS[2]]
    out = rustle(effort, body, rate=390, spread_db=-5.0, flex_db=4.5, flex_power=1.6, rub_db=-1.5,
                 crinkle_db=-2.0, crinkle_power=0.52, side_db=3.0)
    return out + crinkles(effort, BAG, rate=22, panel_db=0, crack_db=-9, scatter_db=6.5)


def room(x, early_db, late_db, early_s):
    """Scattering and reverberation: table and nearby things scatter at once; walls add a short tail."""
    # Each row: frequency in hertz, time to fall by 60 dB in seconds.
    decay_times = [(100, 0.16), (300, 0.2), (800, 0.23), (2000, 0.27), (5000, 0.25), (13000, 0.26)]
    # Small things scatter only short waves. Each row: frequency in hertz, relative level in dB.
    scatter = [(200, -17), (700, 0.5), (16000, 2)]
    t = np.arange(SR // 2) / SR
    hz = np.fft.rfftfreq(len(t), 1 / SR)
    white = rfft(diffuse(len(t)))
    tail = 0
    for k, (_, t60) in enumerate(decay_times):
        # A band that is full at its own frequency and fades to nothing at its neighbours.
        share = on_log(hz, [(f, j == k) for j, (f, _) in enumerate(decay_times)])
        tail = tail + irfft(white * share, len(t)) * undb(-60 * t / t60)
    tail = tail * (1 - np.exp(-t / 0.0045))
    early = colour(diffuse(len(t)) * np.exp(-t / early_s) * (t > .001), scatter)
    h = undb(early_db) * early / np.linalg.norm(early[0])
    h = h + undb(late_db) * tail / np.linalg.norm(tail[0])
    out = np.zeros((2, N))
    for start, end in PASSAGES:  # each cut ends the reverberation of its passage
        direct = x[:, int(start * SR):int(end * SR)]
        reflected = signal.fftconvolve(direct, h, axes=1)[:, :direct.shape[1]]
        add(out, start, direct + reflected)
    return out


def scene():
    """Superposition: all the handling in the room, the china direct, over a faint hush."""
    dry = thin_bag() + cone_stream() + landing_cones()
    dry += taps() + paper_bag_handling() + creases() + load_shifts() + snips() + blades()
    dry += finger_squeak() + foil_ticks()
    dry += wrapper_sliding() + drops() + wrapper_scuff() + bag_lifting()
    china = cone_bowl() + chocolate_bowl()
    return china + room(dry, early_db=-5.0, late_db=-8.5, early_s=0.0096) + hush()


def record(dry):
    """Linear filtering: the microphone's place colours the sound; the phone cuts the top."""
    # Standing waves between table and walls. Each row: frequency in hertz, relative level in dB.
    place = [(30, -8), (70, 0.5), (115, 0.5), (180, 2.5), (260, -1.5), (340, 1.5), (520, -0.5), (730, 1.5),
             (860, 1.5), (1050, 3.5), (1300, 0.5), (2000, 2), (16000, 0)]
    low_pass = signal.ellip(10, .2, 70, 16000, fs=SR, output="sos")  # edge in hertz
    return signal.sosfilt(low_pass, colour(dry, place, size=4096))


dry = scene()
out = record(dry)
materialize(out)
```